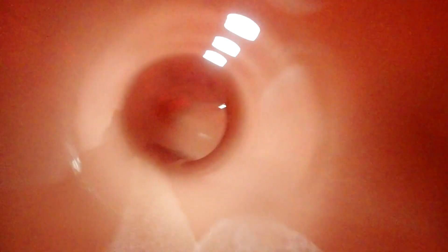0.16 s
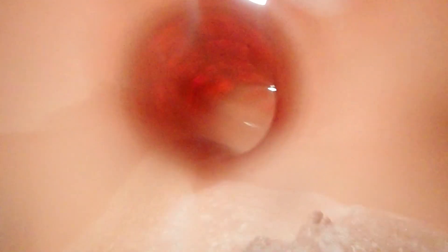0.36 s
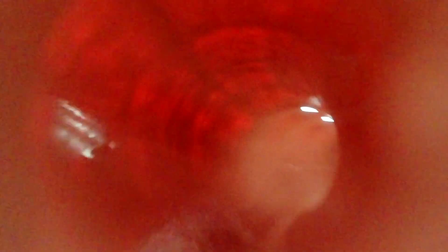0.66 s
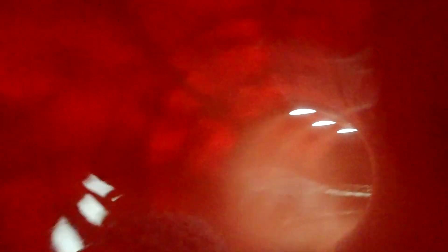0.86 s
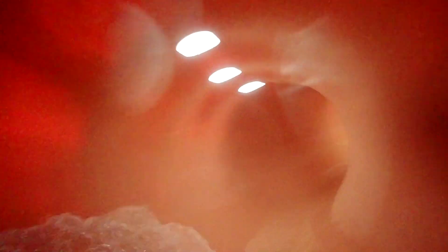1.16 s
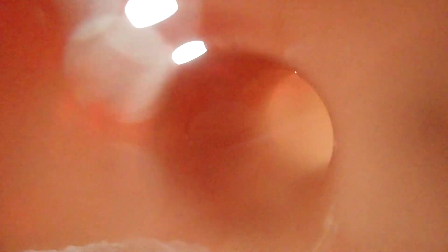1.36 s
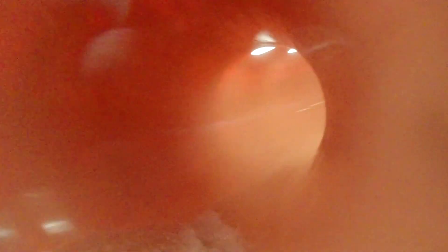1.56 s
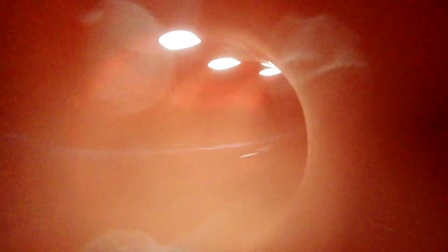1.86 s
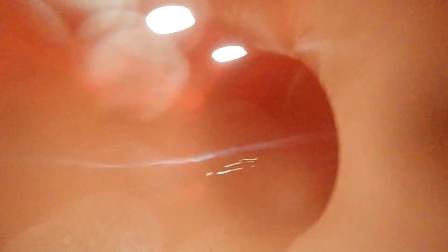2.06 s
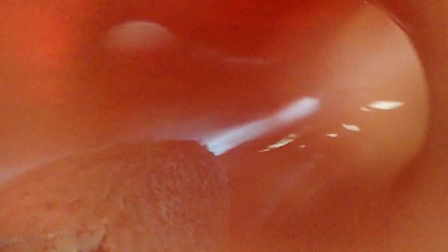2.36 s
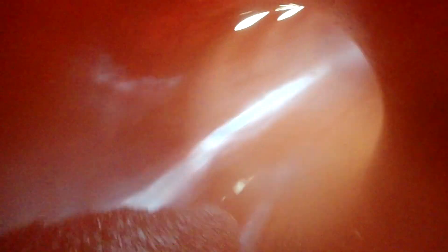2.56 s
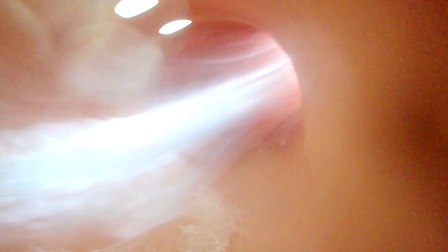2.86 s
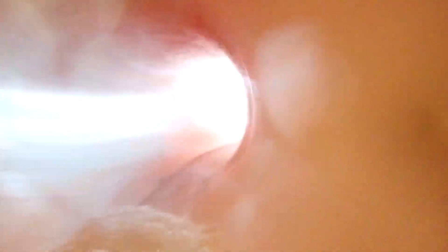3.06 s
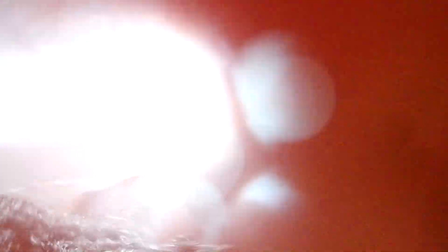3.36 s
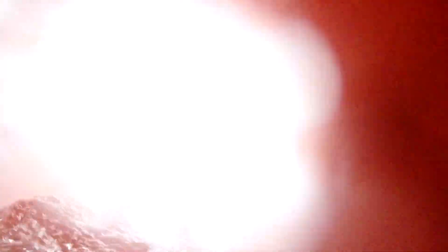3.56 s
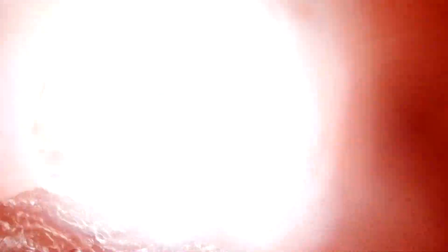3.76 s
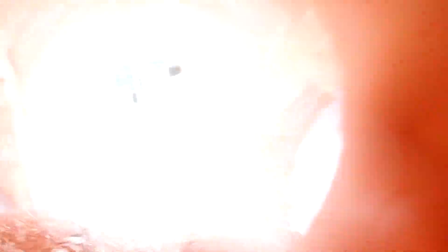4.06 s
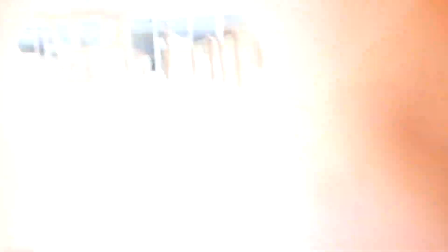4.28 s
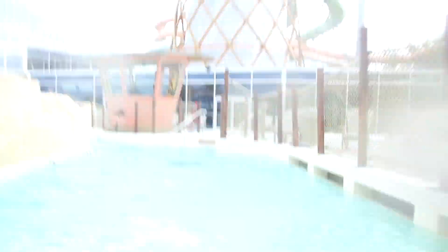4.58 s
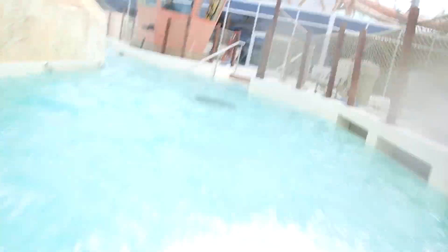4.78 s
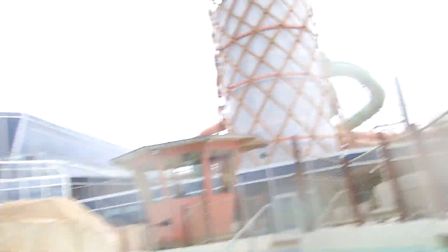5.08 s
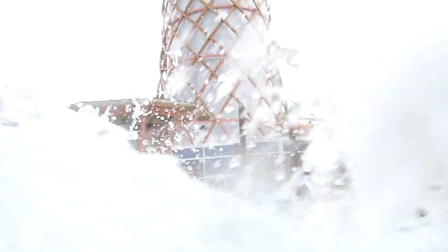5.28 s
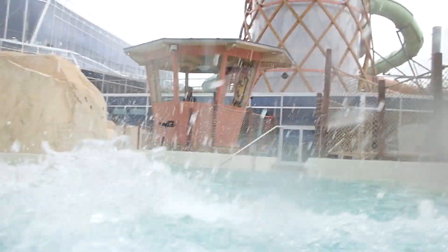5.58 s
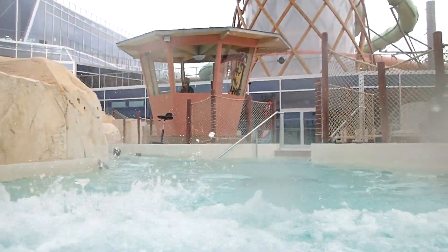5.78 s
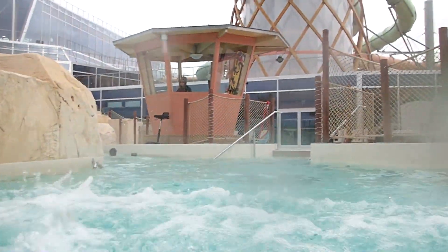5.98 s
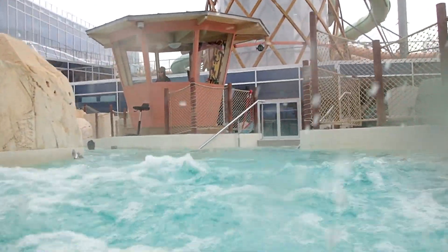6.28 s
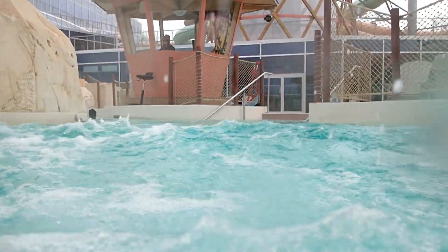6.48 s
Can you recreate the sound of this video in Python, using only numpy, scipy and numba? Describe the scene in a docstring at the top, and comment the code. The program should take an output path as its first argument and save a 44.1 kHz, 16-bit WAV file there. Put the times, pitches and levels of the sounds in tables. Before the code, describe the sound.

A waterproof camera carried down an enclosed water slide picks up buffeting air, churning water, a low rumbling shell and dull thuds at the seams. The roar swells through a fast bend, thins as the tube opens, then spray bursts hard. A wave cracks and gurgles over the microphone, leaving hollow, muffled pool wash and a few late plops.

```python
"""A rider carries a waterproof camera down an enclosed tube slide: coloured noise that follows the flow
makes the air buffeting its two ports, the rumbling shell, churning water and spray; decaying sines knock.
The tube opens, the rider skims into the pool, and a wave of noise cracks, sagging rings and rising bubbles
slaps over the camera. A film of water then rings on each port as a resonator driven by noise, so the wash
of the pool comes through hollow and muffled, at another pitch in each ear; two sagging rings plop late."""
import sys
import numpy as np
from scipy import signal
from scipy.fft import rfft, irfft, next_fast_len
from scipy.io import wavfile
from scipy.ndimage import map_coordinates
from numba import njit

SR = 44100
rng = np.random.default_rng(int(sys.argv[2]) if len(sys.argv) > 2 else 0)


def log_audio(samples):
    """Write samples as a 16-bit WAV file to the path given in sys.argv[1]."""
    # one column per channel
    frames = np.atleast_2d(samples).T
    # limit to full scale, then quantise
    limited = np.clip(frames, -1, 1)
    pcm = np.round(limited * 32767).astype(np.int16)
    wavfile.write(sys.argv[1], SR, pcm)


N = 292383  # length in samples

EXIT_S, EXIT_LENGTH_S = 4.16, 0.45  # the tube opens
DUNK_S = 5.265  # the wave begins to roll over the camera
RIGHT_LATE_S = 0.065  # the right port is covered after the left

# Flow of water past the rider, on the scale of its spray level: t/s, level/dB
FLOW_CURVE = [(0.0, -36.5), (0.28, -41.5), (0.69, -30), (0.99, -32.5), (1.01, -36.5), (1.22, -30),
              (1.26, -35), (1.64, -31), (1.8, -24.5), (2.52, -27.5), (2.57, -23.5), (3.08, -23),
              (3.44, -29), (3.86, -27), (4.46, -38.5), (4.65, -37.5), (4.82, -28), (4.95, -17.5),
              (4.98, -19.5), (5.09, -20.5)]
CRUISE_DB = -25  # the flow at which the base levels hold
BEND_S, BEND_LENGTH_S, BEND_EDGE_S = 2.32, 0.8, 0.28  # the fastest bend presses the rider on the shell
BRAKE_S, BRAKE_LENGTH_S, BRAKE_DB = 5.07, 0.06, 16  # the pool slows the rider and the air stream
SHELTER_S, SHELTER_FADE_S, SHELTER_DB = 0.66, 0.14, 6.5  # the left port starts turned from the water
DUNK_EDGE_S, SPRAY_CUT_S = 0.021, 0.02
SPRAY_DIP_SHARE = 0.57  # the spray dips less in dB


def ride():
    """Flow noise: one stream drives buffeting, rumble, churn and spray until the wave closes the ports."""
    flow_db = curves(FLOW_CURVE)[0] - CRUISE_DB
    eddies = np.array([wobble(45), wobble(45)])  # each port meets its own eddies
    outside = ramp(EXIT_S, EXIT_LENGTH_S)
    bend = swell(BEND_S, BEND_LENGTH_S, BEND_EDGE_S)
    braking_db = BRAKE_DB * ramp(BRAKE_S, BRAKE_LENGTH_S)
    shelter_db = SHELTER_DB * (1 - ramp(SHELTER_S, SHELTER_FADE_S)) * np.array([[1], [0]])

    air = buffeting(flow_db, eddies, outside, bend, braking_db, shelter_db)
    shell = shell_rumble(flow_db, eddies, outside, bend, braking_db)
    water = churn(flow_db, eddies, outside, shelter_db)

    dip = dips()
    # both ports start to close together; the right one takes longer
    closing_s = np.array([[DUNK_EDGE_S], [DUNK_EDGE_S + RIGHT_LATE_S]])
    open_ports = 1 - ramp(DUNK_S, closing_s)
    through_ports = ((air + water) * dip + shell * dip ** 0.7) * open_ports ** 2
    return through_ports + spray(flow_db) * dip ** SPRAY_DIP_SHARE * (1 - ramp(DUNK_S, SPRAY_CUT_S))


# Spectrum of air turbulence at the ports: f/Hz, level per Hz/dB
BUFFET_SPECTRUM = [(20, -67), (50, -28), (100, -16), (170, -7.5), (280, -1), (500, 2), (620, -2.5),
                   (720, -18.5), (1000, -14.5), (2000, -58)]
LEFT_BUFFET_DB, RIGHT_BUFFET_DB = -18, -14.5  # the right port faces the air stream
LEFT_GROWS, RIGHT_GROWS = 0.43, 0.02  # dB per dB of flow
EXIT_LOSS_DB, BEND_LEE_DB = 5.5, 4


def buffeting(flow_db, eddies, outside, bend, braking_db, shelter_db):
    """Turbulent pressure: low noise, nearly independent at the two ports, modulated by eddies."""
    air_db = np.array([LEFT_BUFFET_DB + LEFT_GROWS * flow_db, RIGHT_BUFFET_DB + RIGHT_GROWS * flow_db])
    air_db = air_db - EXIT_LOSS_DB * outside - braking_db - BEND_LEE_DB * bend - 0.3 * shelter_db
    noise = rush(BUFFET_SPECTRUM, [(100, 0.073)], grain_db=2, grain_rate=150)
    return amp(air_db + 1.1 * eddies) * noise


# Jets sweeping over the housing: t/s, length/s, level/dB (before eddies), left-right/dB
JET_EVENTS = [(0.0, 0.2, -20, -25), (0.161, 0.23, -15.5, -21), (0.42, 0.057, -19.5, -22),
              (0.524, 0.35, -22, -20), (0.738, 0.18, -19, -20), (0.913, 0.17, -18, -23),
              (1.198, 0.15, -26, -7), (1.327, 0.092, -20.5, -21), (1.421, .14, -20.5, -13),
              (1.583, 0.046, -20, -10), (2.379, 0.062, -17, 11), (3.3, 0.666, -23, 9),
              (3.966, 0.19, -22.5, -10), (4.107, 0.17, -16, -21), (4.184, 0.17, -14.5, -5.5),
              (4.325, 0.17, -17.5, -19.5), (4.433, 0.28, -19, -26.5)]
# Spectra of churning water and of thin sheets: f/Hz, level per Hz/dB
CHURN_SPECTRUM = [(400, -23.5), (680, -5), (830, 1.5), (1050, 0), (1500, -7.5), (2000, -16), (2500, -32.5),
                  (3300, -47), (4500, -34.5), (8000, -71)]
SHEET_SPECTRUM = [(400, -21), (700, 0.5), (1000, 4), (1450, 2.5), (1900, -6.5), (2400, -23.5),
                  (3200, -28.5), (4500, -23), (8000, -67)]
# Left-right likeness of the churn: f/Hz, coherence/1
CHURN_COHERENCE = [(700, 0.072), (1200, 0.43), (2000, 0.52), (4000, 0.15)]
CHURN_DB, CHURN_GROWS = -20, 0.52  # base level, dB per dB of flow
JET_EDGE_S = 0.032  # rise and fall


def churn(flow_db, eddies, outside, shelter_db):
    """Incoherent power addition: the level of the water follows the summed power of flow and jets."""
    jet_power = 0
    for s, length, db, pan in JET_EVENTS:
        jet_power = jet_power + (amp(db) * panned(pan) * swell(s, length, JET_EDGE_S)) ** 2
    sheets = rush(SHEET_SPECTRUM, [(500, 1.0), (1200, 1.0), (4000, 0.61)], grain_db=2.5, grain_rate=500)
    bulk = rush(CHURN_SPECTRUM, CHURN_COHERENCE, grain_db=2.0, grain_rate=350)
    water = blend(bulk, sheets, outside)  # thin sheets in the open
    flow_power = amp(CHURN_DB + CHURN_GROWS * flow_db - shelter_db) ** 2
    return np.sqrt(flow_power + jet_power) * amp(1.73 * eddies) * water


# Spectrum of spray: f/Hz, level per Hz/dB
SPRAY_SPECTRUM = [(700, -19.5), (1700, 0), (2600, -15.5), (3300, -22), (4000, -14), (4700, -1.5), (5500, 0),
                  (6600, -1.5), (7600, -5), (8600, -3.5), (9500, -7.5), (10400, -20.5), (13500, -14),
                  (15700, -27)]
# Left-right likeness of the spray: f/Hz, coherence/1
SPRAY_COHERENCE = [(3300, 0.87), (5500, 0.53), (9000, 0.11), (15000, 0)]
SPRAY_DB = -22  # base level


def spray(flow_db):
    """Granular noise: fine mist gives way to more strongly clumped droplets at equal power."""
    mist = rush(SPRAY_SPECTRUM, SPRAY_COHERENCE, grain_db=0.5, grain_rate=1100)
    droplets = rush(SPRAY_SPECTRUM, SPRAY_COHERENCE, grain_db=4.0, grain_rate=1300)
    return amp(SPRAY_DB + flow_db + 0.8 * wobble(30)) * blend(mist, droplets, ramp(4.63, 0.64))


RUMBLE_DB, RUMBLE_GROWS, BEND_RUMBLE_DB = -26.5, 0.55, 5  # base level, dB per dB of flow, gain in bend


def shell_rumble(flow_db, eddies, outside, bend, braking_db):
    """Structure-borne sound: the shell rumbles louder with the flow and with the load in the bend."""
    level_db = RUMBLE_DB + RUMBLE_GROWS * flow_db + BEND_RUMBLE_DB * bend - 1.8 * outside - 0.5 * braking_db
    return amp(level_db) * panned(-2.5) * rumble(eddies)


# Knocks on the tube and in the pool: t/s, level/dB (before onset and pan), f/Hz, left-right/dB
BUMP_EVENTS = [(0.025, -12, 150, -14), (1.202, -5.5, 149, 10), (1.211, -1.5, 322, -6), (1.239, -8, 227, 6),
               (1.262, -14, 190, -6), (1.547, -3.5, 336, -7), (1.801, -15, 293, 3), (2.06, -7, 264, -19),
               (2.15, -6, 300, -7), (2.39, -3.5, 246, -12), (2.758, -4, 203, -9), (2.804, -10, 170, 4),
               (3.371, -7, 312, -13), (4.01, -6, 229, 5), (4.735, -7.5, 577, -13), (4.791, -7, 443, -16),
               (4.97, -4, 169, -15)]
BUMP_T60_S = 0.062


def bumps():
    """Impulse response of damped modes: seams and bends give short dull thuds."""
    out, t = np.zeros((2, N)), np.arange(SR // 8) / SR
    for s, db, hz, pan in BUMP_EVENTS:
        modes = np.sin(2 * np.pi * hz * t) + 0.26 * np.sin(2 * np.pi * 125 * t)
        thud = modes * amp(-60 * t / BUMP_T60_S) * (1 - np.exp(-t / 0.006))
        add(out, s, amp(db) * panned(pan) * thud)
    return out


# Drops on the housing: t/s, relative level/dB, left-right/dB, tick above the drop/dB
DROP_EVENTS = [(0.274, -15, -14, -32), (1.251, -5, -22, -25), (1.327, -7, -15, -30), (1.457, -6, -8, -16),
               (1.669, -5.5, -12, -19), (4.501, -6.5, -16, -16), (4.664, -9, 7, -29), (4.736, -7, -22, -25),
               (5.105, -15, 0, -3), (5.121, -16, -1, -2), (5.131, -19, 0, -1), (5.221, -10, -3, -9),
               (5.348, -11, -14, -8), (5.544, -4, 19, -5.5)]
# Flung spray on the housing: t/s, relative level/dB, length/s
SPATTER_EVENTS = [(5.101, 1.5, 0.0075), (5.113, 1.5, 0.024), (5.205, -0.5, 0.032), (5.23, -3.5, 0.029),
                  (5.276, -20.5, 0.039), (5.317, -12, 0.014), (5.488, -28, 0.0043), (5.518, -31, .014),
                  (5.95, -22.5, .007), (6.02, -18, 0.014), (6.035, -24, 0.015), (6.126, -25, 0.02),
                  (6.18, -32.5, 0.057)]
# Spectra of a drop's pop and tick: f/Hz, level per Hz/dB
POP_SPECTRUM = [(25, -35), (100, -3.5), (500, 6.5), (1100, 8), (1800, -3), (2600, -23), (4000, -27.5),
                (8000, -40)]
TICK_SPECTRUM = [(1500, -37), (3000, -14), (4200, -25), (5400, 9.5), (7000, 2), (9000, -3), (10500, -15.5),
                 (14000, -28)]


def drops():
    """Impact excitation: drops pop and tick on the housing; flung spray spatters in noise bursts."""
    pops, ticks, spatter = np.zeros((3, 2, N))
    t = np.arange(SR // 12) / SR
    for s, db, pan, tick_db in DROP_EVENTS:
        add(pops, s, amp(db + 13.5) * panned(pan))  # a single impulse
        add(ticks, s, amp(db + tick_db - 1.0 - 60 * t / 0.0061) * rng.standard_normal((2, len(t))))
    for s, db, length in SPATTER_EVENTS:
        u = np.minimum(t / max(length, 0.002), 1)
        burst = np.sin(np.pi * u ** 0.95) ** 2
        # the small power makes a broad plateau with steep ends
        add(spatter, s, amp(db - 15.0) * burst ** 0.18 * rng.laplace(size=(2, len(t))))
    wet = ramp(5.38, 0.08)  # wet ports lose the top treble
    on_wet = coloured(ticks + wet * spatter, TICK_SPECTRUM)
    return coloured(pops, POP_SPECTRUM) + on_wet + coloured((1 - wet) * spatter, SPRAY_SPECTRUM)


# Water slapping the ports, and two late bubble plops at the left one:
# t/s, relative level/dB, initial f/Hz, left-right/dB, relative crack level/dB
SLAP_AND_PLOP_EVENTS = [(5.269, -5.5, 814, 31, 2.5), (5.289, -8.5, 703, 42, -3), (5.301, -10, 296, 24, -6),
                        (5.33, -12.5, 620, 24, 1.5), (5.348, -7.5, 399, -29, -1.5),
                        (5.359, -9, 400, -7, -7), (5.379, -3, 532, 19, -14.5), (5.399, -6.5, 443, 14, -4.5),
                        (5.429, -12, 342, -18, -4.5), (5.456, -5.5, 463, 22, -7.5),
                        (5.512, -10.5, 498, 13, -32), (5.631, -16, 517, -21, -13.5),
                        (6.023, -3.5, 505, -4, -15), (6.043, -4.5, 496, -16, -13),
                        (6.062, -4.5, 478, -33, -10), (6.466, -11, 778, 15, -24), (6.51, -13, 782, 15, -25)]
RING_T60_S = 0.053


def slaps_and_plops():
    """Loaded cavity resonance: each slap or plop rings the air at a port, with more or less crack."""
    rings, cracks, t = np.zeros((2, N)), np.zeros((2, N)), np.arange(SR // 6) / SR
    for s, db, hz, pan, crack_db in SLAP_AND_PLOP_EVENTS:
        strength = amp(db + 3.5) * panned(pan)
        cycles = hz * (t - 0.73 * t ** 2)  # the pitch sags as water loads the port
        envelope = amp(-60 * t / RING_T60_S) * (1 - np.exp(-t / 0.0021))
        add(rings, s, strength * np.sin(2 * np.pi * cycles) * envelope)
        add(cracks, s, strength * amp(crack_db - 2.5 - 60 * t / 0.036) * rng.standard_normal(len(t)))
    return rings + coloured(cracks, POP_SPECTRUM) + amp(-21) * coloured(cracks, SPRAY_SPECTRUM)


# Spectrum of the dry crack: f/Hz, level per Hz/dB
SHOVE_CRACK_SPECTRUM = [(300, 3.5), (1500, 0), (3500, -1), (5000, -25), (12000, -17)]
SHOVE_S, SHOVE_DB, SHOVE_HZ, SHOVE_CRACK_DB = 6.062, -5.5, 152, -23.5


def shove():
    """Membrane displacement: a hard slap shoves the right port, giving a low thump with a dry crack."""
    thump, crack, t = np.zeros((2, N)), np.zeros((2, N)), np.arange(SR // 12) / SR
    tone = np.sin(2 * np.pi * SHOVE_HZ * t) * amp(-60 * t / 0.04)
    noise = rng.standard_normal(len(t)) * amp(-60 * t / 0.029)
    add(thump, SHOVE_S, amp(SHOVE_DB) * panned(-29) * tone)
    add(crack, SHOVE_S, amp(SHOVE_CRACK_DB) * panned(-22) * noise)
    return thump + coloured(crack, SHOVE_CRACK_SPECTRUM)


def gurgle(count=16):
    """Bubble resonance: bubbles rise in pitch as the wave rolls over; the higher ones die sooner."""
    out, t = np.zeros((2, N)), np.arange(SR // 12) / SR
    for when, height, weakness, side in rng.random((count, 4)):
        hz = 330 * 4.1 ** height
        life = 11 / hz  # seconds to fall by 40 dB
        tone = np.sin(2 * np.pi * hz * t * (1 + 0.095 * t / life))
        bubble = tone * amp(-40 * t / life) * (1 - np.exp(-t / 0.00067))
        level_db = -7 - 10 * weakness - 4.1 * height
        add(out, 5.33 + 0.12 * when, amp(level_db) * panned(30 * (side - 0.5)) * bubble)
    return out


# Spectra of the pool's wash and of its foam: f/Hz, level per Hz/dB
POOL_SPECTRUM = [(25, -37), (80, -13), (160, -3.5), (300, 2.5), (500, 3.5), (1000, 4), (1700, 1.5),
                 (2500, -17), (3500, -30), (9000, -49)]
FIZZ_SPECTRUM = [(1800, -7), (2400, -28), (2850, -18), (3500, -32), (4400, -28), (5200, -10), (5800, 1),
                 (6800, -10), (9200, -11), (10600, -27), (15000, -29)]
# Left-right likeness of wash and foam: f/Hz, coherence/1
POOL_COHERENCE = [(100, 1), (500, 0.63), (1500, 1), (6000, 0.23), (10000, .3)]
LEFT_FILM_HZ, RIGHT_FILM_HZ = 813, 512  # before any sag
LEFT_SAG, RIGHT_SAG = 0.43, 0.3  # share of the pitch lost at full load
SOAK_S, DRAIN_AT_S, DRAIN_S = 0.06, 5.49, 0.13  # DRAIN_S is an exponential time constant
REWET_S, REWET_SAG = 6.07, 0.12  # a late slap leaves a thicker film on the right port
SETTLE_S, SETTLE_GAIN_DB = 0.27, 4.5  # the left film rings louder and more purely as it comes to rest
LEFT_WASH_DB, RIGHT_WASH_DB = -15.5, -14
GUSH_DB, CROSSTALK_DB = 4, -17.5  # left gain under water; share of the right film in the left ear
GUSH_RISE_S, RIGHT_RISE_S = 0.086, 0.013  # water builds up on the left port, takes the right abruptly
DUNK_LENGTH_S, DUNK_RUMBLE_DB, POOL_RUMBLE_DB = 0.31, -26.5, -42.5
FOAM_DB, FOAM_FADE_DB_PER_S = -40.5, 6.5
UNDER_S, UNDER_LENGTH_S, UNDER_HUSH_DB, UNDER_FIZZ_DB = 5.463, 0.1, 9, 16  # losses wholly under water


def pool():
    """Mass-loaded resonance: films on the ports colour the wash, over a rumble and the fizz of foam."""
    t = np.arange(N) / SR
    load = ramp(DUNK_S, SOAK_S) * np.exp(-np.maximum(t - DRAIN_AT_S, 0) / DRAIN_S)
    rewet, settled = ramp(REWET_S, 0.02), ramp(REWET_S, SETTLE_S)
    wash = rush(POOL_SPECTRUM, POOL_COHERENCE, grain_db=1.2, grain_rate=420)

    left_hz = LEFT_FILM_HZ * (1 - LEFT_SAG * load)
    right_hz = RIGHT_FILM_HZ * (1 - RIGHT_SAG * load - REWET_SAG * rewet)
    left_leak = 0.99 * (1 - 0.9 * load) * (1 - 0.99 * settled)
    left = film(wash[0], left_hz, damping=0.094, leak=left_leak)
    right = film(wash[1], right_hz, damping=0.071, leak=0.5 - 0.21 * rewet)
    left = amp(LEFT_WASH_DB + GUSH_DB * load + SETTLE_GAIN_DB * settled) * left
    right = amp(RIGHT_WASH_DB) * right
    ports = np.array([left + amp(CROSSTALK_DB) * right, right])

    dunk = swell(DUNK_S, DUNK_LENGTH_S, DUNK_EDGE_S)
    low = (amp(DUNK_RUMBLE_DB) * dunk + amp(POOL_RUMBLE_DB)) * rumble(wobble(45))
    foam = rush(FIZZ_SPECTRUM, POOL_COHERENCE, grain_db=1.5, grain_rate=510)
    fizz = amp(FOAM_DB - FOAM_FADE_DB_PER_S * (t - DUNK_S)) * foam

    under, dip = swell(UNDER_S, UNDER_LENGTH_S, 0.0089), dips()
    left_covered = ramp(DUNK_S, GUSH_RISE_S) ** 0.52
    covered = np.array([left_covered, ramp(DUNK_S + RIGHT_LATE_S, RIGHT_RISE_S)])
    muffled = (ports * amp(-UNDER_HUSH_DB * under) * dip + low) * covered
    return muffled + fizz * amp(-UNDER_FIZZ_DB * under) * dip ** 1.04 * ramp(DUNK_S, 0.013)


def film(x, hz, damping, leak):
    """Resonant transmission: a sharp wavering ring of the water film over a broad, dull leak."""
    step = 2 * np.pi * hz * (1 + 0.017 * wobble(25)) / SR
    ring = unit(resonate(x, step, damping))
    return unit(ring + leak * unit(resonate(x, step, 0.35)))


@njit
def resonate(x, step, damping):
    """Driven damped oscillator: a mass on a spring of moving pitch; step is in radians a sample."""
    y = np.zeros(len(x))
    place, speed = 0.0, 0.0
    for i in range(len(x)):
        speed += step[i] * (x[i] - place - damping * speed)
        place += step[i] * speed
        y[i] = place
    return y


# Spectrum of the low rumble: f/Hz, level per Hz/dB
RUMBLE_SPECTRUM = [(25, -45), (60, -15), (100, -8.5), (150, -1.5), (240, -1.5), (330, -1.5), (430, -10),
                   (900, -65)]


def rumble(eddies):
    """Modulated low-frequency noise: the rider's weight on the shell and in the water."""
    return amp(2.5 * eddies) * rush(RUMBLE_SPECTRUM, [(100, 0.056)], grain_db=3.0, grain_rate=70)


# Brief dips in level: t/s, depth/dB (negative is a rise), end of recovery after t/s
DIP_EVENTS = [(0.385, -1.5, .07), (1.072, 4, 0.16), (1.285, 7, 0.047), (3.383, 3.5, 0.17),
              (4.75, 4.5, 0.66), (5.13, 12.5, 0.14), (5.549, 19, 0.34), (6.068, 10.5, 0.28)]
DIP_ATTACK_S = 0.0046


def dips():
    """Gain modulation: the level dips abruptly at each listed time and climbs back evenly in dB."""
    depth_db = sum(db * ramp(s, DIP_ATTACK_S) * (1 - ramp(s, back)) for s, db, back in DIP_EVENTS)
    return amp(-depth_db)


def rush(spectrum, alike, grain_db, grain_rate):
    """Partial coherence: clumped stereo noise of rms 1, its mid and side weighted by likeness."""
    clumps = amp(grain_db * np.array([wobble(grain_rate), wobble(grain_rate)]))

    def mid_side(hz):
        turn = np.arccos(np.clip(along(alike, hz), -1, 1)) / 2
        return amp(along(spectrum, hz)) * [np.cos(turn), np.sin(turn)]

    mid, side = filtered(clumps * rng.standard_normal((2, N)), mid_side)
    return unit(np.array([mid + side, mid - side]))


def coloured(x, spectrum, size=2048):
    """Minimum phase: x through a causal filter of energy 1, found by folding the cepstrum."""
    cepstrum = irfft(np.log(amp(along(spectrum, np.fft.rfftfreq(size, 1 / SR)))))
    cepstrum[1:size // 2] *= 2
    cepstrum[size // 2 + 1:] = 0
    pulse = irfft(np.exp(rfft(cepstrum)))
    return signal.fftconvolve(x, pulse[None] / np.linalg.norm(pulse), axes=1)[:, :N]


def filtered(x, response):
    """Linear filtering: the spectrum of x times a response of frequency."""
    m = next_fast_len(N + SR // 2)
    return irfft(rfft(x, m) * response(np.fft.rfftfreq(m, 1 / SR)), m)[..., :N]


def blend(first, second, share):
    """Equal-power crossfade from the first sound to the second."""
    return np.cos(share * np.pi / 2) * first + np.sin(share * np.pi / 2) * second


def panned(pan_db):
    """Interaural level difference: left and right gains of mean power 1."""
    gains = amp(np.array([pan_db, -pan_db]) / 2).reshape(2, -1)
    return gains / np.sqrt(np.mean(gains ** 2, axis=0))


def add(track, s, sound):
    """Superposition: mix a stereo sound in at time s."""
    part = track[:, round(s * SR):][:, :sound.shape[1]]
    part += sound[:, :part.shape[1]]


def wobble(rate):
    """Random modulation: a smooth curve through random knots, rate of them a second."""
    return map_coordinates(rng.standard_normal(int(N * rate / SR) + 4), [np.arange(N) * rate / SR])


def swell(start, length, edge):
    """Trapezoid envelope: rises to 1, holds and falls to 0 within the given length."""
    return ramp(start, edge) * (1 - ramp(start + length - edge, edge))


def ramp(start, length):
    """Linear envelope: rises from 0 to 1."""
    return np.clip((np.arange(N) / SR - start) / length, 0, 1)


def curves(rows):
    """Linear interpolation: one value per sample for each column after the time."""
    s, *cols = np.transpose(rows)
    return [np.interp(np.arange(N) / SR, s, c) for c in cols]


def along(points, hz):
    """Logarithmic frequency: (f/Hz, value) points read on a log axis."""
    f, v = np.transpose(points)
    return np.interp(np.log(hz + 1), np.log(f + 1), v)


def amp(db):
    """Logarithmic level: decibels to amplitude gain."""
    return 10 ** (np.asarray(db) / 20)


def unit(x):
    """Root mean square: scale to rms 1."""
    return x / np.sqrt(np.mean(x ** 2) + 1e-20)


def scene():
    """Superposition of the ride, the splash and the pool."""
    return ride() + bumps() + drops() + slaps_and_plops() + shove() + gurgle() + pool()


def record(dry):
    """Soft saturation and band limit: the camera rounds off the highest peaks and cuts the top treble."""
    rounded = dry / (1 + np.abs(dry) ** 6) ** (1 / 6)
    return filtered(rounded, lambda hz: hz < 15700)


dry = scene()
out = record(dry)
log_audio(out)
```